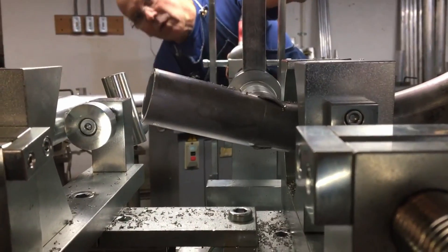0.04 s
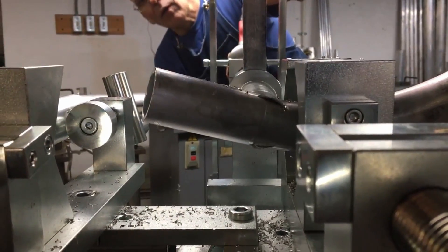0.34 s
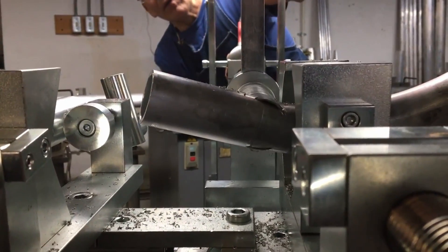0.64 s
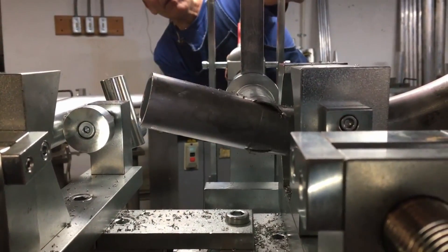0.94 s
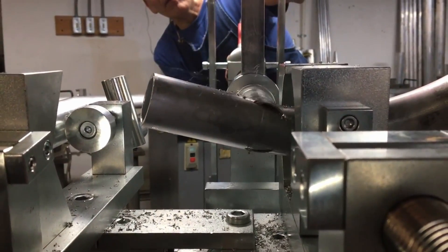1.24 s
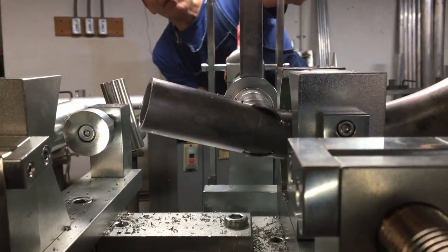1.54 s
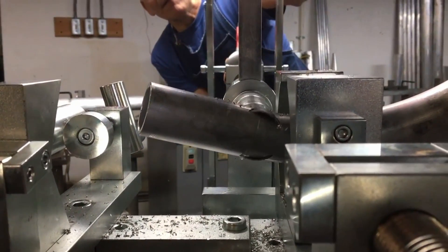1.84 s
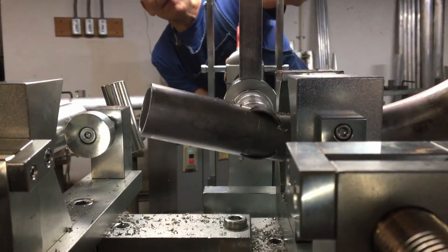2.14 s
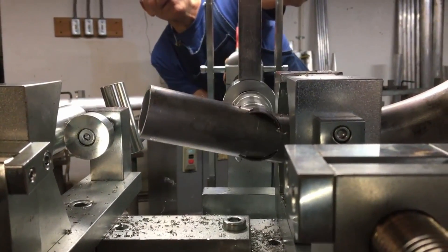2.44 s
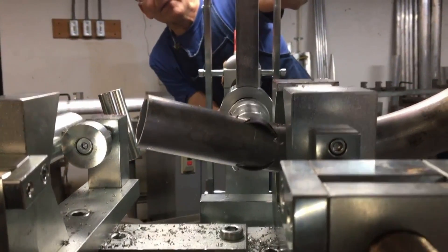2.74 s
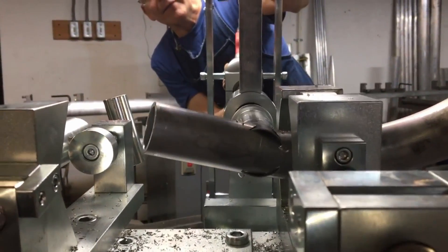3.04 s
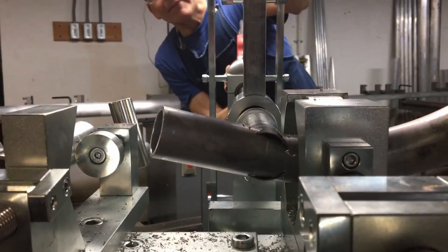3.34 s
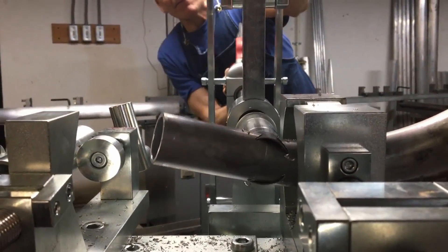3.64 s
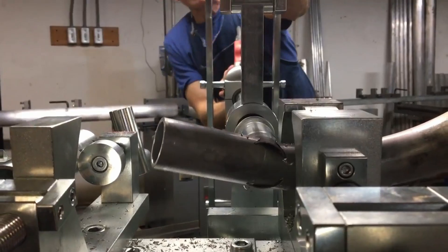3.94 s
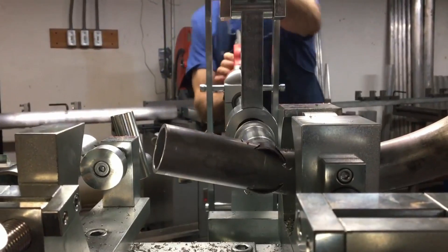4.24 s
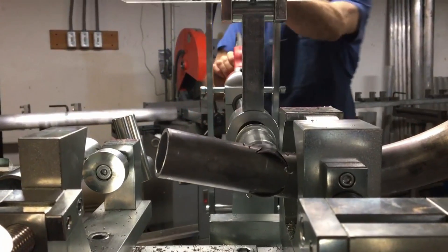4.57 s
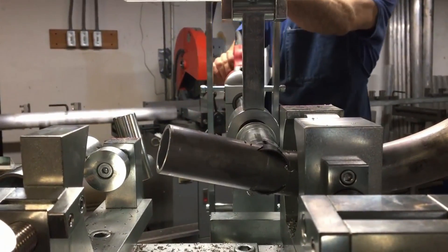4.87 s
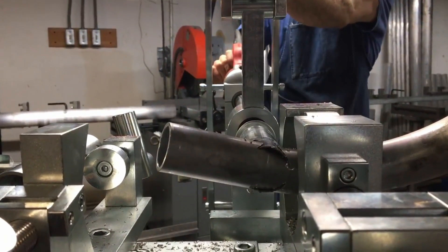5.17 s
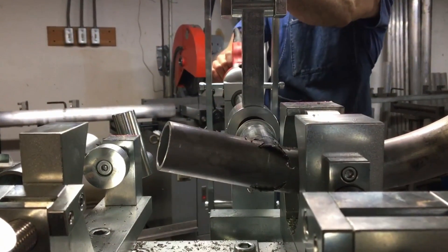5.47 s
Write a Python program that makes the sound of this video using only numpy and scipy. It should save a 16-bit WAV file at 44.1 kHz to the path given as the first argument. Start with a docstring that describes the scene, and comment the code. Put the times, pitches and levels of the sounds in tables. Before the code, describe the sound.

In a workshop, an electric drill drives a hole saw through a steel tube, heard close up. Gears whine over a pulsing metal rasp. The teeth snag with a few sharp screeches and thuds, then break through, and the motor races higher. Switched off, it winds down amid ticking chips and clacks to a stop, leaving a faint tinkle, a soft scuff and room hum.

```python
"""Hole saw through a steel tube

An electric drill drives a hole saw through a tube clamped on a notcher in a workshop. Gears and
brushes whine over the rasp of the teeth; the saw snags, breaks through, and the unloaded motor races.
Switched off, it coasts down. As it clacks to a stop the level jumps up, leaving the room's hum,
the tinkle of a falling chip and a scuff."""
import sys
import numpy as np
from scipy import signal
from scipy.fft import rfft, irfft
from scipy.io import wavfile

SR = 44100
rng = np.random.default_rng(int(sys.argv[2]) if len(sys.argv) > 2 else 0)


def store_pcm(level_fs):
    """Save levels as 16-bit WAV."""
    pcm = np.round(np.clip(level_fs, -1, 1) * 32767).astype(np.int16)
    wavfile.write(sys.argv[1], SR, np.atleast_2d(pcm).T)


N = 251766
TIME = np.arange(N) / SR
FREE_HZ, SAG_HZ = 357.4, 50.48  # shaft turns a second without load, and what full load takes off
OFF_S, STOP_S = 3.83, 5.19  # power off, standstill
IDLER_RATIO, SAW_RATIO = 6.34, 90.7  # shaft turns to one turn of the idler gear, of the saw

# room tone of the ventilation: (frequency [Hz], level [dB])
AIR_COLOUR = [(25, -28), (40, -13), (60, 1), (160, 2), (240, -2), (600, -10), (770, -17), (1400, -7),
              (2200, -15), (4000, -21), (7000, -27), (15500, -32)]
# hum of mains and fans: (frequency [Hz], level [dB])
HUM_LINES = [(59.5, -82.5), (103, -88), (121, -79.5), (360.7, -80), (629.8, -82.5), (958.2, -86)]
# dull rub of the drill being shifted: (frequency [Hz], level [dB])
SCUFF_COLOUR = [(200, -27), (480, -17), (570, -3), (680, -9), (800, -10), (1500, -15), (2500, -23),
                (6000, -35), (15000, -42)]
# tinkle of a steel chip: (frequency [Hz], relative level [dB], t60 [s])
CHIP_MODES = [(9300, -64, 0.42), (12100, -61, 0.27), (12980, -62, 0.25), (15400, -75, 0.17)]
# gears knocking into their slack: (time [s], level [dB], decay [s])
KNOCKS = [(5.11, -54, 0.037), (5.16, -72, 0.019)]
# tone of those knocks: (frequency [Hz], level [dB])
KNOCK_COLOUR = [(200, -3), (800, -8), (1300, 2), (2300, -3), (4000, -8.5), (7000, -15), (15500, -27)]
# ring of the housing after the first knock: (frequency [Hz], level [dB], t60 [s])
HOUSING_MODES = [(1280, -67, .35), (1362, -66, .37), (1588, -62, .25), (2094, -68, .35), (2410, -68, .22),
                 (3000, -74, 0.36), (5550, -77, .3)]
# curls of swarf skittering over the jig: (time [s], level [dB], half length [s], pitch [Hz])
SKITTERS = [(3.751, -47, .018, 10100), (3.76, -54, 0.028, 13870), (4.062, -46, 0.016, 13600),
            (4.148, -56, 0.0098, 12800), (4.261, -54, 0.011, 13700)]
# the tube jerking in its clamp: (time [s], level [dB], half length [s], pitch [Hz])
JOLTS = [(2.157, -53, 0.024, 268), (2.277, -49, 0.012, 282), (2.435, -52, 0.013, 372),
         (2.458, -42, 0.007, 228), (2.481, -45, .007, 215), (2.581, -51, .008, 240),
         (2.618, -48, 0.013, 240), (2.713, -49, 0.01, 654), (2.757, -52, .025, 250),
         (4.695, -61, 0.027, 241)]
# teeth catching on the cut edge: (time [s], level [dB], decay [s])
SNAGS = [(2.4394, -31, 0.0077), (2.4452, -26.5, 0.004), (2.587, -33, .003), (4.661, -28.7, 0.005),
         (4.966, -66, 0.0029), (5.0845, -76, 0.0021), (5.16, -63, .005)]
# bright screech of a snag: (frequency [Hz], level [dB])
SNAG_COLOUR = [(1000, -13), (4500, -5), (5600, 1), (7000, 1), (8500, 0), (12500, -2), (15500, -4)]
# resonances of the cut edge: (frequency [Hz], width [Hz], lift [dB])
EDGE_PEAKS = [(5800, 300, 3), (8600, 300, 6)]
# resonances of the drill and the steel frame: (frequency [Hz], width [Hz], lift [dB])
FRAME_PEAKS = [(635, 100, 4.5), (873, 31, 7), (1320, 120, 0), (1540, 55, 2), (2090, 160, 0), (3073, 53, 6),
               (3820, 440, 4.5), (4340, 280, 3.5), (4950, 550, -5.5), (5760, 210, 2), (7020, 154, 5.5),
               (7770, 420, -5), (9000, 300, -0.5), (10100, 220, 0), (10300, 400, -1), (12200, 190, 0),
               (14300, 550, 2)]
# brushes cutting, running free and coasting, a row each: (scrape [dB], whine [dB], roughness [0-1])
BRUSH_STATES = [(-42, -38.5, 0.26), (-39.5, -49.5, 0.4), (-40.5, -42.5, 0.96)]
# scrape of carbon on the commutator: (frequency [Hz], level [dB])
BRUSH_COLOUR = [(300, -38), (900, -21), (1300, -9.5), (2200, -1.5), (4000, -5.5), (5000, -2.5),
                (7000, -5.5), (8000, -12.5), (11000, -22), (15500, -29)]
# brief swells of the brush whine in the last turns: (time [s], lift [dB], half length [s])
BRUSH_SWELLS = [(4.89, 1.5, .012), (4.996, 7.5, 0.0095)]
# motor shell resonances that the brush whine sweeps through: (frequency [Hz], width [Hz], lift [dB])
SHELL_PEAKS = [(2050, 200, -2), (2817, 400, 2), (4054, 540, -1.5), (5200, 400, -2), (6100, 600, 3),
               (7000, 300, 2.5), (7609, 790, 5.5), (8590, 310, -26), (12100, 730, -9), (12800, 161, 6.5)]
# motor and gear tones: (multiple of shaft speed, loaded level [dB], free-running level [dB])
GEAR_LINES = [(0.9995, -71, -54.5), (2, -56, -62.5), (3.01, -64, -52), (5, -51, -54), (8, -56, -62),
              (9, -49, -58), (10, -54.5, -65), (14, -53, -66), (15, -49.5, -55), (20, -48, -68),
              (21, -54, -65), (22, -58, -70), (24, -59, -69), (28, -56, -51), (30, -64, -66),
              (33, -58, -77), (35, -49.5, -60), (40, -59, -90), (42, -51, -68), (48, -60, -80)]
# resonances and a dead spot of the gearbox: (frequency [Hz], width [Hz], lift [dB])
GEARBOX_PEAKS = [(606, 15, 6), (650, 76, -4.5), (716.5, 62, 7)]
# tones of the first gear mesh: (multiple of shaft speed, loaded level [dB], free-running level [dB])
MESH_LINES = [(2, -54, -56), (4, -50, -42), (6, -41.2, -50.5), (12, -48, -50), (18, -50.5, -62)]
# swells of the free-running pinion tone: (time [s], lift [dB], half length [s])
MESH_SWELLS = [(3.24, 4, 0.063), (3.719, 6.5, 0.075)]
# roar of gearbox and fan: (frequency [Hz], level [dB])
ROAR_COLOUR = [(30, -48), (60, -39), (160, -14), (300, -14), (500, -12.5), (700, -11.5), (880, -4),
               (1400, 2.5), (1900, -4.5), (3000, -7), (5000, -11.5), (9700, -11), (12000, -14),
               (15500, -19)]
# rasp of teeth on steel: (frequency [Hz], level [dB])
RASP_COLOUR = [(50, -51), (200, -12.5), (900, 5), (1500, 8.5), (3200, 2), (5000, -1), (7200, 0),
               (8500, -11), (13000, -10), (15500, -2.5)]
# resonances of the tube under the saw: (frequency [Hz], width [Hz], lift [dB])
TUBE_PEAKS = [(1877, 85, 10.5), (2890, 440, 8.5), (3727, 74, 13.5), (4680, 110, 2), (6800, 100, 1),
              (7330, 135, 17)]
# how hard the teeth press into the steel: (time [s], load [0-1])
SAW_LOAD = [(0, 0.86), (.16, 0.92), (.45, 1), (2.25, 0.96), (2.38, 0.94), (2.57, 0.53), (2.7, .34),
            (2.9, 0.16), (3.3, 0.09), (3.8, 0.06)]


def amp(db):
    """Decibels to gain."""
    return 10 ** (np.asarray(db) / 20)


def unit(x):
    """Scale to rms 1."""
    return x / np.sqrt(np.mean(x ** 2))


def drift(rate_hz):
    """Smooth random modulation of rms 1, moving at up to about the given rate."""
    f = np.arange(N // 2 + 1) * SR / N
    return unit(irfft(rfft(rng.standard_normal(N)) * np.exp(-.5 * (f / rate_hz) ** 2), N))


def narrow_band(angle, width_hz):
    """A band of noise, rms 1, that tracks a pitch."""
    return drift(width_hz) * np.cos(angle) + drift(width_hz) * np.sin(angle)


def grains(per_second, scatter_db):
    """Tiny random impacts of uneven size, rms 1."""
    hit = rng.random(N) < per_second / SR
    return unit(hit * rng.standard_normal(N) * amp(scatter_db * np.clip(rng.standard_normal(N), -2, 2)))


def colour(x, spectrum, peaks=()):
    """EQ with a broad curve plus peaks and dips; white noise keeps its power."""
    f = np.arange(N // 2 + 1) * SR / N + 1
    hz, db = np.transpose(spectrum)
    gain_db = np.interp(np.log(f), np.log(hz), db)
    for centre, width, lift in peaks:
        gain_db = gain_db + lift / (1 + (2 * (f - centre) / width) ** 2)
    return irfft(rfft(x) * unit(amp(gain_db)), N)


def swell(centre_s, half_length_s):
    """A smooth rise and fall round a moment."""
    return np.exp(-.5 * ((TIME - centre_s) / half_length_s) ** 2)


def bursts(table):
    """Envelope of sharp hits that die away."""
    return sum(amp(db) * (TIME >= s) * np.exp(-np.abs(TIME - s) / decay) for s, db, decay in table)


def ring(modes, start_s):
    """Modes struck together, each dying at its own pace."""
    age = np.maximum(TIME - start_s, 0)
    return sum(amp(db - 60 * age / t60) * np.sin(2 * np.pi * hz * age) for hz, db, t60 in modes)


def reverb(x, wet_db, t60_low=0.41, t60_high=0.14):
    """Dry sound plus a diffuse tail, with separate decay times below and above 3.5 kHz."""
    age = TIME[:SR // 2]
    noise = rng.standard_normal(len(age))
    low = signal.sosfilt(signal.butter(2, 3500, fs=SR, output="sos"), noise)
    tail = low * amp(-60 * age / t60_low) + (noise - low) * amp(-60 * age / t60_high)
    tail *= age > .003  # pre-delay
    wet = signal.fftconvolve(x, tail / np.sqrt(np.sum(tail ** 2)))[:N]
    return (x + amp(wet_db) * wet) / np.sqrt(1 + amp(2 * wet_db))


def motor_hz(load, drag_hz=279.1):
    """Load drags the motor down; switched off, its fan brakes it most above drag_hz, friction below."""
    coast_left = np.clip((STOP_S - TIME) / (STOP_S - OFF_S), 0, 1)
    run_down = np.tan(coast_left * np.arctan(FREE_HZ / drag_hz)) * drag_hz / FREE_HZ
    return (FREE_HZ - SAG_HZ * load) * run_down


def shaft_angle(hz, load, wobble=0.001079, jitter=0.002905):
    """The shaft's speed sways with the bite of the saw and trembles with gear backlash."""
    sway = wobble * drift(9.5) + jitter * (1 - 0.36 * load) * drift(141)
    return 2 * np.pi * np.cumsum(hz * (1 + sway)) / SR


def saw_turn(angle):
    """Slow throb, peaking each time the saw's high side comes round."""
    return np.cos(angle / SAW_RATIO + 0.12)


def room_tone(air_db=-69.5):
    """A bed of ventilation rumble with a few wavering hum lines."""
    air = colour(rng.standard_normal(N), AIR_COLOUR, [(640, 73, 9.6)]) * amp(air_db + 0.65 * drift(5))
    hum = sum(amp(db) * np.sin(2 * np.pi * hz * TIME + .5 * drift(4.9)) for hz, db in HUM_LINES)
    return air + np.sqrt(2) * hum


def scuff(at_s=5.46):
    """A dull, brief rub as the drill is shifted."""
    return colour(grains(2000, 1.8) * swell(at_s, 0.057), SCUFF_COLOUR) * amp(-65)


def falling_chip(at_s=5.272):
    """A sliver of steel lands with a tick and tinkles."""
    impact = bursts([(at_s, -74, .012)]) * rng.standard_normal(N)
    tick = colour(impact, [(3000, -18), (8000, 0), (15500, -2)])
    return tick + amp(-14) * ring(CHIP_MODES, at_s)


def gear_knocks():
    """The gears clack as the drill comes to rest, and the first clack rings the housing."""
    clacks = colour(bursts(KNOCKS) * grains(9000, 2), KNOCK_COLOUR)
    return clacks + ring(HOUSING_MODES, KNOCKS[0][0])


def swarf(speed, per_second=40, ring_s=.002):
    """Flung chips tick against the jig for as long as the saw turns."""
    age = TIME[:SR // 20]
    hits = grains(per_second, 1.6)
    tick = unit(rng.standard_normal(len(age)) * np.exp(-age / ring_s))
    ticks = signal.fftconvolve(hits, tick)[:N]
    bright = colour(ticks, [(4000, -20), (8000, 0), (11500, -10), (14000, -4), (15500, -4)])
    return unit(bright) * speed ** 1.4 * amp(-51)


def skitters(width_hz=330):
    """Thin curls of steel sizzle briefly, each at its own pitch."""
    return sum(amp(db) * swell(s, length) * narrow_band(2 * np.pi * hz * TIME, width_hz)
               for s, db, length, hz in SKITTERS)


def tube_boom(angle, load, speed, pitch_hz=238, waver_hz=14):
    """The clamped tube booms at its bending mode, swelling once a turn of the saw under load."""
    swell_db = load * (2 + 2.5 * saw_turn(angle)) + 3 * drift(waver_hz)
    boom = np.sqrt(2) * np.cos(2 * np.pi * pitch_hz * TIME + 0.6 * drift(waver_hz))
    return boom * speed * amp(-61 + swell_db)


def plug_drone(angle, start_s=1.6, loose_s=2.7, attack_s=0.18, high_hz=401, low_hz=207):
    """The steel plug inside the saw drones, sinking as its last bridge thins and fading once it gives."""
    hz = np.clip(high_hz - 155 * (TIME - start_s), low_hz, high_hz)
    since_loose = TIME - loose_s
    arc_db = np.minimum(0.5 * since_loose, -26 * since_loose)  # slow build, quick fade
    onset = np.clip(1 + (TIME - start_s) / attack_s, 0, 1)
    drone = narrow_band(2 * np.pi * np.cumsum(hz) / SR, width_hz=48)
    return drone * onset * amp(-54 + arc_db - saw_turn(angle))


def jolts():
    """Each jerk of the tube is a rough thud, with low chatter and a rattle from the clamp."""
    thuds, envelope = 0, 0
    for s, db, length, hz in JOLTS:
        push = amp(db) * swell(s, length)
        thuds += push * np.sqrt(2) * np.cos(2 * np.pi * hz * TIME + 0.79 * drift(55))
        envelope += push
    chatter = colour(grains(2000, 1.3), [(110, -36), (230, -10), (430, 13), (900, -11), (4000, -47)])
    rattle = colour(grains(7600, 1.8), RASP_COLOUR, FRAME_PEAKS)
    return thuds + envelope * (chatter * amp(-7) + rattle * amp(-2))


def snags():
    """A tooth snaps over the thin edge: a very short, bright screech that leaves it ringing."""
    screech = colour(bursts(SNAGS) * rng.standard_normal(N), SNAG_COLOUR, FRAME_PEAKS + EDGE_PEAKS)
    return reverb(screech, wet_db=-10.5, t60_low=.3, t60_high=0.35)


def brush_whine(angle, roughness, bars=18):
    """Two brushes take turns on the copper bars and sing at twice the bar rate; bounce smears the tone."""
    bar_angle = bars * angle
    tone_angle = 2 * bar_angle
    chatter = unit(narrow_band(tone_angle, 160) + .5 * narrow_band(tone_angle, 480))
    tone = np.sqrt(2 - 2 * roughness ** 2) * np.cos(tone_angle) + roughness * chatter
    side_tones = narrow_band(bar_angle, 40) + narrow_band(tone_angle + 6 * angle, 40)
    side_tones += narrow_band(3 * bar_angle, 60)
    eq = [(500, -50), (1200, 7), (7500, -1), (9000, -1), (15000, 0.5)]
    return colour(tone + amp(-14) * side_tones, eq, FRAME_PEAKS + SHELL_PEAKS)


def brushes(angle, load, speed, settle_s=0.5, knee_hz=51, fade_db_per_s=2):
    """Carbon scrapes and whines on the commutator; the whine eases off in the cut and frays coasting."""
    cutting = np.minimum(load / 0.906, 1) ** 5
    coasting = np.clip((TIME - OFF_S) / settle_s, 0, 1)
    blend = np.array([cutting, 1 - cutting - coasting, coasting])
    scrape_db, whine_db, roughness = np.transpose(BRUSH_STATES) @ blend
    scrape = colour(grains(9000, 0.9) * (1 + 0.031 * np.cos(angle)), BRUSH_COLOUR, FRAME_PEAKS)
    whine = brush_whine(angle, np.clip(roughness, 0, 1))
    surge_db = sum(db * swell(s, length) for s, db, length in BRUSH_SWELLS)
    whine_db += surge_db - fade_db_per_s * TIME * cutting + 2.1 * drift(31)
    sliding = (speed * FREE_HZ / knee_hz) ** 3  # drops away steeply below the knee
    fade = speed ** 0.48 * sliding / (1 + sliding)
    return (scrape * amp(scrape_db + 0.96 * drift(25)) + whine * amp(whine_db)) * fade


def gear_whine(angle, load, speed, flutter_db=3.5, wander_db=0.2, slack=0.32):
    """Fluttering shaft harmonics glide through the gearbox resonances; unloaded, tooth slack blurs them."""
    tones = 0
    for multiple, loaded_db, free_db in GEAR_LINES:
        db = free_db + load * (loaded_db - free_db)
        db += flutter_db * np.clip(drift(61), -2, 1.3) + wander_db * np.clip(drift(14), -2, 1)
        blur = slack * (1.3 - load) * min(multiple / 4, 1) * drift(27)
        waver = 1 + 0.37 * drift(16) * (multiple < 3)  # lowest tones only
        tones += amp(db) * waver * np.cos(np.round(multiple) * angle + blur)
    whine = np.sqrt(2) * colour(tones, [(20, 0), (20000, 0)], GEARBOX_PEAKS)
    return whine * speed ** 2.8 * amp(-2)


def mesh_whine(angle, load, speed, pinion_teeth=6, race_db=4):
    """The gear mesh sings, pulsing under load; its top cries out as the motor races, lingers coasting."""
    idler_pulse = 1 + 0.19 * load * np.cos(angle / IDLER_RATIO)
    saw_pulse = amp(0.5 * load * saw_turn(angle))
    run_down = speed * FREE_HZ / (FREE_HZ - SAG_HZ * load)  # 1 until the power is off
    racing = 4 * load * (1 - load)  # peaks at half load
    swell_db = sum(db * swell(s, length) for s, db, length in MESH_SWELLS)
    tones = 0
    for multiple, loaded_db, free_db in MESH_LINES:
        upper = multiple >= pinion_teeth
        db = free_db + load * (loaded_db - free_db)
        db += swell_db * (multiple == pinion_teeth) + race_db * racing * upper
        db += np.clip(drift(8.1), -2, 1) + 2 * np.clip(drift(22), -2.5, 1)  # wander and flutter
        fade = run_down ** (2.1 if upper else 3.12)
        blur = (0.25 + 0.39 * (1 - load)) * drift(25)
        tones += amp(db) * fade * np.cos(multiple * angle + blur)
    return np.sqrt(2) * tones * idler_pulse * saw_pulse * amp(-2.5)


def gear_roar(angle, load, speed, flicker_db=1.65):
    """Tooth impacts and fan air, pulsing twice a turn of the idler gear, ring the housing."""
    pulse = 1 + 0.15 * np.cos(2 * angle / IDLER_RATIO)
    clatter = colour(grains(20000, 1.3) * pulse, ROAR_COLOUR, FRAME_PEAKS)
    level_db = -34.5 + 0.13 * load + flicker_db * np.clip(drift(43), -2, 1.3)
    return clatter * speed ** 1.75 * amp(level_db)


def saw_rasp(angle, load, speed, pulse_db=3, patchy_db=0.5):
    """Teeth tear chips in uneven bursts, pushed by each turn of the idler gear, and ring the tube."""
    burst_db = pulse_db * np.cos(angle / IDLER_RATIO) + patchy_db * np.clip(drift(38), -2, 1.3)
    tearing = colour(grains(9000, 1.6) * amp(burst_db), RASP_COLOUR, FRAME_PEAKS + TUBE_PEAKS)
    return tearing * load * speed * amp(-37.5)


def scene():
    """Load sets the shaft speed, and the two play the running machine; both channels are alike."""
    load = np.clip(np.interp(TIME, *np.transpose(SAW_LOAD)), 0, 1)
    hz = motor_hz(load)
    speed = hz / FREE_HZ
    angle = shaft_angle(hz, load)
    # the drill stands behind the jig and gets the most room
    drill = gear_roar(angle, load, speed) + brushes(angle, load, speed) + gear_knocks() + scuff()
    # saw and tube are close up
    cut = gear_whine(angle, load, speed) + saw_rasp(angle, load, speed) + snags() + jolts()
    cut += plug_drone(angle) + swarf(speed) + skitters() + falling_chip()
    # the mesh whine and the tube's boom stay dry, so they sound clear and steady
    dry_tones = mesh_whine(angle, load, speed) + tube_boom(angle, load, speed)
    roomy = reverb(drill, wet_db=-5.5, t60_low=0.9, t60_high=0.46)
    close = reverb(cut, wet_db=-13)
    mono = dry_tones + roomy + close + room_tone()
    return np.array([mono, mono])


def record(dry, jump_s=5.11, jump_db=10, hiss_db=-79, top_hz=15750):
    """The level jumps up at the first clack and stays up; a faint hiss holds even, and the top is cut."""
    gain = amp(jump_db * np.clip((TIME - jump_s) / .001, 0, 1))
    hiss = amp(hiss_db) * rng.standard_normal(N)
    high_cut = signal.ellip(10, .2, 70, top_hz, fs=SR, output="sos")
    return signal.sosfilt(high_cut, dry * gain + hiss)


dry = scene()
out = record(dry)
store_pcm(out)
```